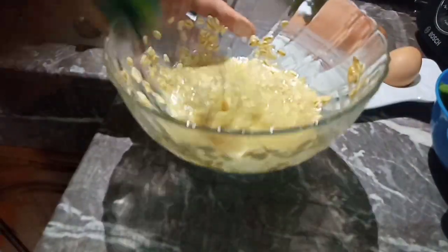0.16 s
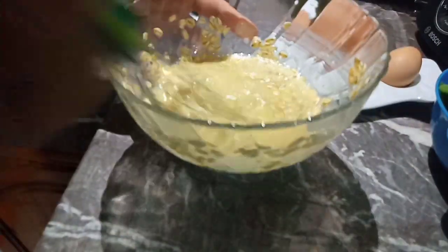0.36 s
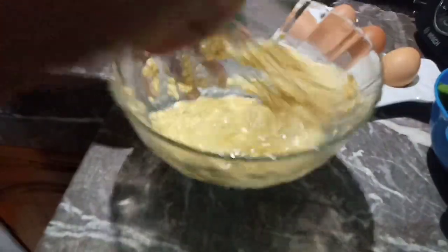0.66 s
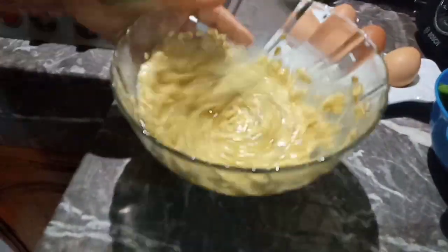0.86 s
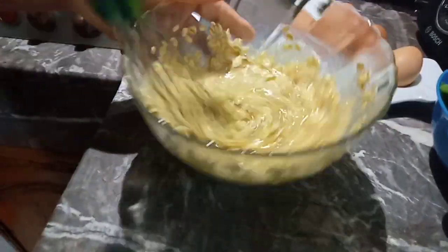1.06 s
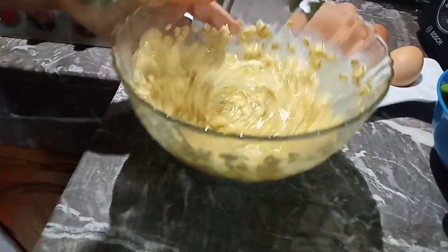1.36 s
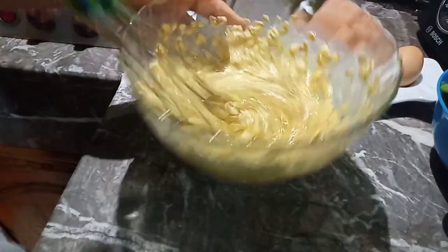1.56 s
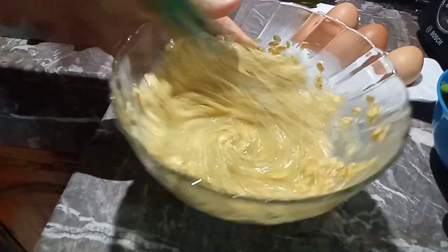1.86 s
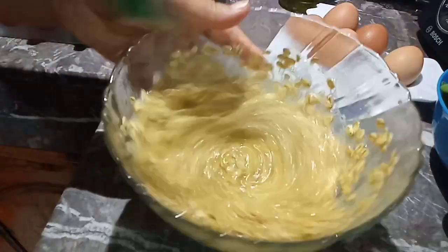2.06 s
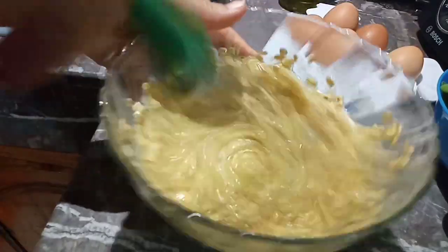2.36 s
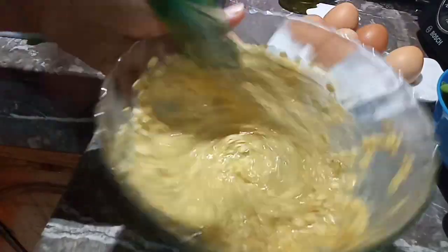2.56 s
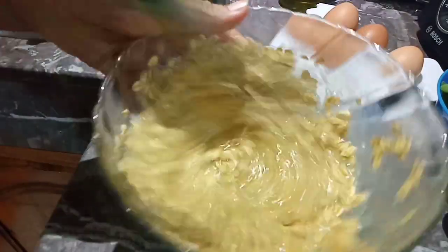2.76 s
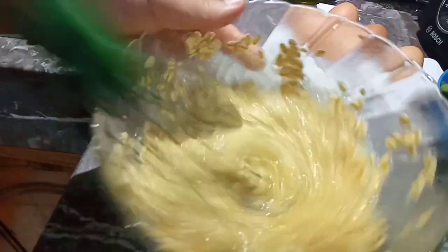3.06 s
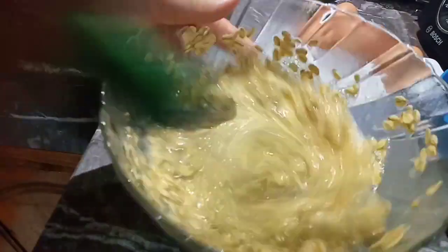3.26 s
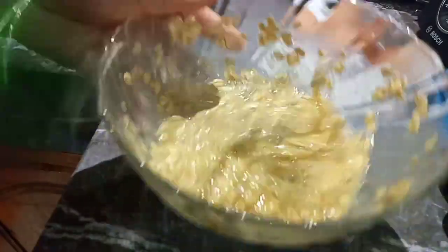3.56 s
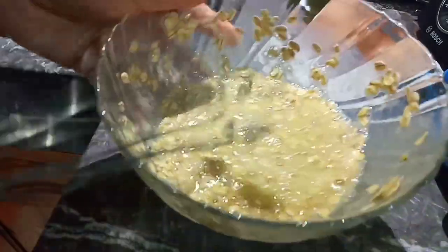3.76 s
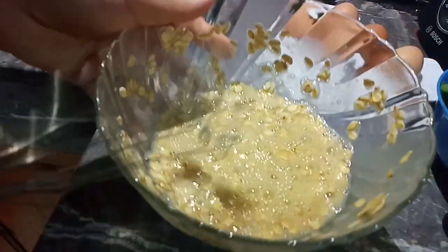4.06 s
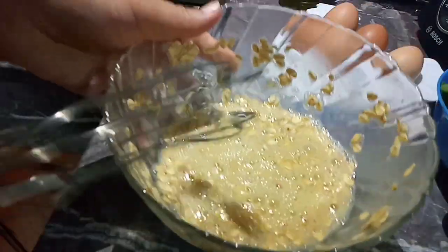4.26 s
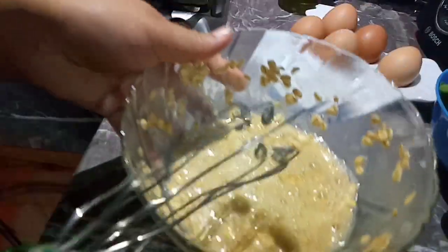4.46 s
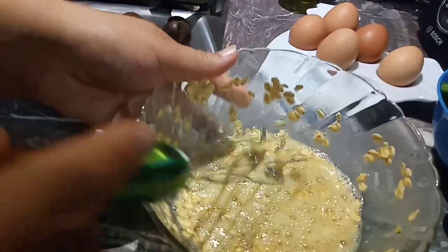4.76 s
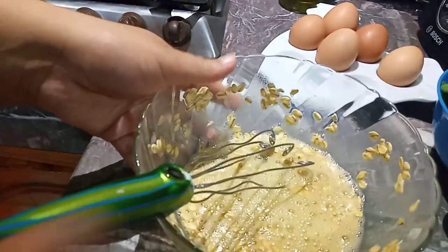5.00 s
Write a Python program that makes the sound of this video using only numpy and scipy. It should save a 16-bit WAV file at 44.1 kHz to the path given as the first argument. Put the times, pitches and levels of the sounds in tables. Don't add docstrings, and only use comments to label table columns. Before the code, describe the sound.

Close in a small hard-walled kitchen, a wire whisk taps a glass bowl's rim twice, then quickly beats wet oats and egg with dense clicks and gritty scraping. After about three seconds the stirring stops, light glassy taps follow, and the bowl lands on a stone counter with loud dull knocks. A steady fan and faint fridge hum lie beneath.

```python
import sys
import numpy as np
from scipy import signal
from scipy.fft import rfft, irfft, next_fast_len
from scipy.io import wavfile
from scipy.ndimage import uniform_filter1d, minimum_filter1d, map_coordinates

SR = 44100
rng = np.random.default_rng(int(sys.argv[2]) if len(sys.argv) > 2 else 0)


def magnitude_from_level(level_db):
    exponent = np.asarray(level_db, float) / 20
    return 10 ** exponent


def unload_wav(signal):
    wavfile.write(
        sys.argv[1],
        SR,
        np.round(np.clip(np.atleast_2d(signal).T, -1, 1) * 32767).astype(np.int16),
    )


N = 226277

# frequency in Hz, level in dB per Hz.
FAN_SPECTRUM = [(15, -63), (25, -25.5), (108, -3.5), (172, -13), (192, -6.5), (296, -9), (399, -18),
                (470, -18), (524, -11.5), (1220, -16), (2820, -11), (4020, -13), (5570, -32.5),
                (14000, -47), (16500, -55)]
# frequency in Hz, level in dB rms.
FRIDGE_HUM = [(120, -61), (182, -72), (240, -67.5)]
# frequency in Hz, t60 in seconds.
ROOM_T60 = [(200, 0.56), (2000, 0.42), (5000, 0.34), (15000, 0.24)]

# start in seconds, level in dB, frequency in Hz, t60 in seconds.
THUMPS = [
    (0.075, -34.5, 130, 0.028),
    (0.316, -27.5, 130, 0.014),
    (2.214, -35.5, 130, 0.033),
    (2.449, -10.5, 137, 0.007),
    (2.664, -23, 130, 0.012),
    (3.318, -40, 130, 0.037),
    (4.176, -25, 130, 0.017),
    (4.394, -37, 130, 0.03),
]
# start in seconds, level in dB,
# frequency in Hz, t60 in seconds.
RIM_HUMS = [(.0705, -14, 3700, .045), (.0705, -20, 2530, .04), (.0705, -24, 3100, .04),
            (.0705, -35, 6718, .07), (.075, -32, 2440, .25), (.3145, -22, 2369, .25),
            (.325, -26, 3600, .15), (.388, -25, 3650, .03), (.3145, -14, 3655, .06),
            (.3145, -20, 2560, .05), (.3145, -27, 3149, .06), (.384, -42, 581, .14),
            (.543, -42.5, 590, .16), (3.667, -32, 533, .2), (3.676, -29, 2246, .1), (3.687, -33, 2000, .03),
            (3.711, -33, 2400, .05), (3.839, -38, 1577, .1), (3.851, -32, 1346, .2),
            (3.851, -32, 2379, .22), (3.851, -30, 3779, .12), (3.92, -38, 5006, .14),
            (3.92, -33, 2420, .15), (3.92, -33, 1400, .06), (3.932, -30, 1346, .14),
            (3.932, -33, 3618, .18), (4.045, -26, 1550, .04), (4.046, -26, 3876, .065),
            (4.058, -29, 3790, .08), (4.058, -35, 4775, .04), (4.046, -31, 2500, .08),
            (4.058, -30, 2390, .16), (4.17, -21.5, 3900, .056), (4.172, -28, 5030, .04),
            (4.182, -21, 3960, .044), (4.183, -20, 2374, .12), (4.94, -21, 635, .2),
            (4.941, -19, 1389, .35), (4.942, -23, 2363, .3), (4.958, -22, 1389, .25),
            (4.957, -41, 3575, .5)]
# start in seconds, level in dB, frequency in Hz, t60 in seconds.
WET_PINGS = [(1.165, -26, 4200, .02), (1.2705, -25, 3590, .05), (1.485, -36, 8290, .03),
             (1.529, -39, 9350, .03), (1.765, -26, 915, .03), (1.99, -34, 8290, .04),
             (1.998, -32, 8290, .03), (2.041, -30, 4050, .02), (2.055, -32, 3750, .02),
             (2.141, -33, 786, .12), (2.199, -30, 816, .08), (2.215, -31, 8290, .04),
             (2.449, -30, 8290, .03), (2.666, -29, 8290, .04), (3.103, -25, 645, .08),
             (3.208, -28, 773, .05), (3.33, -26, 640, .06), (1.03, -30, 600, .08), (1.11, -37, 850, .1)]

# start in seconds, peak in dB, blow frequency in Hz,
# blow t60 in seconds, shudder in dB re the blow.
KNOCKS = [
    (4.7376, 0, 1620, .012, -14.5),
    (4.76, -16, 900, .008, -10),
    (4.78, -27, 237, .1, 4),
    (4.9445, -12, 800, .008, -14),
    (4.96, -12, 900, .008, -14),
    (5.005, -15, 1600, .02, -11),
    (5.011, -7, 2340, .014, -13),
    (5.016, -10, 1290, .09, -13),
    (5.022, -15, 960, .04, -12),
]
CUTLERY = [
    (4.74, -27, 4340, 0.045, -29),
]
# frequency in Hz, width in Hz, level in dB.
COUNTER_MODES = [(237, 30, 3), (641, 60, 0), (748, 50, -1), (931, 70, 1), (1290, 60, 0), (1534, 100, 1),
                 (2094, 80, 2), (2256, 80, 2), (2929, 120, -4), (3112, 70, 0), (4300, 140, 6)]
# frequency in Hz, level in dB per Hz.
KNOCK_SPECTRUM = [(59, -54), (100, -16), (236, -8), (407, -6), (647, 0), (866, -2.5), (1310, -4.5),
                  (3840, -17.5), (4330, -32), (6000, -79), (7800, -103), (13200, -120)]

# start in seconds, peak in dB, then levels in dB of the modes
# under 1.9 kHz, over 3 kHz, over 4.6 kHz.
RIM_TAPS = [(0.0695, -18, -14.5, 2, -9), (0.1294, -35, -1.5, 1.5, -5), (0.3135, -12, -15, 2, -10.5),
            (0.3831, -27, -6, 7, -5.5), (0.5424, -24.5, -22, 5.5, -1.5), (3.6656, -21, -10.5, -2, -6),
            (3.6754, -21.5, -14.5, -0.5, -11), (3.8378, -26.5, -3, 2.5, 0.5), (3.8504, -24.5, -6, 3, -2.5),
            (3.9189, -23.5, -3, -0.5, 0), (3.9309, -25, 0, 6.5, -1.5), (4.0441, -22.5, -2, 5.5, -2.5),
            (4.0574, -22, -11, 3, -7.5), (4.169, -17, -9.5, 3, -6.5), (4.1814, -15.5, -6, -6, -4.5),
            (4.4909, -38, -2.5, -21, -3), (4.5082, -40.5, 0, 6, -13), (4.939, -25, 11.5, -13, -33.5),
            (4.9564, -20, 7, -14, -37)]
# t60 under the wires in seconds, level of the tail after it in dB.
TAP_HOLDS = [(.03, -7), (.04, -5), (.045, -5), (.04, -5), (.04, -5), (.04, -5), (.04, -5), (.04, -3),
             (.05, -3), (.04, -3), (.05, -4), (.03, -4), (.04, -4), (.035, -5), (.05, -5), (.04, -5),
             (.04, -5), (.04, -3), (.04, -3)]
# frequency in Hz, level in dB, t60 in seconds.
RIM_MODES = [(538, 0.5, 0.16), (595, -10, .15), (648, 2.5, 0.1), (759, -5, 0.29), (1043, -11.5, 0.42),
             (1353, -2, 0.41), (1374, 3, 0.171), (1627, -2, 0.13), (2026, -41.5, 0.1), (2360, 0.5, 0.49),
             (2443, 5, 0.26), (2610, -3.5, 0.16), (2750, -32.5, 0.3), (3130, -8.5, 0.061),
             (3300, -0.5, 0.038), (3590, -5, 0.074), (3604, 7.5, 0.17), (3807, 7, 0.049), (5030, 1, 0.05),
             (6634, -2, 0.1), (7740, -13, 0.056), (8410, -1.5, 0.092), (9340, -10, 0.037),
             (11100, -15, 0.15), (11200, -24, 0.053), (12100, -20, 0.05), (13570, -28, .07),
             (15300, -6, 0.089)]

# frequency in Hz, width in Hz, level in dB.
WET_MODES = [(640, 50, -5), (790, 60, -4), (915, 50, -5), (1030, 50, -5), (1265, 50, -6), (1840, 150, -3),
             (2710, 150, -3), (3440, 330, 0), (6600, 150, -21), (8290, 180, -14), (9350, 170, -25),
             (10200, 80, -25), (11400, 200, -28), (13800, 300, -27), (15000, 600, -30)]
# start in seconds, peak in dB, loudest mode in Hz,
# brightness over 4.8 kHz in dB.
TIP_TICKS = [(.622, -30.5, 2430, -9), (.6739, -20, 1720, -16), (.726, -19, 3470, -13.5),
             (.7946, -23, 3400, -12), (.9044, -15, 2460, -15), (.9646, -35, 1760, -22),
             (.9831, -21, 1770, -24), (1.165, -16.5, 2700, -16.5), (1.4356, -25, 2480, -19),
             (1.4618, -22.5, 3130, -29), (1.8482, -28.5, 3490, -27), (1.8666, -19.5, 3500, -17.5),
             (1.905, -27, 1850, -17), (1.9384, -20, 2600, -25), (1.9884, -26, 3530, -6),
             (2.083, -32, 3600, -35), (2.2157, -13, 3420, -16), (2.3684, -26, 3640, -26),
             (2.3784, -27, 3150, -15), (2.4256, -21, 3120, -45), (2.5428, -23, 3370, -19),
             (2.5623, -23, 2750, -24), (2.5869, -16, 3450, -21), (2.611, -22, 2620, -16),
             (2.7322, -17.5, 2470, -17), (2.873, -16.5, 2710, -13.5), (2.969, -22.5, 2600, -17),
             (3.0099, -22.5, 1790, -16), (3.0861, -22, 2800, -21), (3.2487, -23, 3350, -32),
             (.6, -30, 2390, -12), (.705, -33, 3000, -6), (.959, -26, 2840, -18), (1.623, -24, 3220, -18),
             (1.657, -32, 2500, -10), (1.714, -25, 3110, -22), (1.801, -30, 2600, -10),
             (2.416, -25, 3150, -20), (2.678, -22, 3400, -12), (2.817, -30, 3000, -8),
             (3.026, -19, 2600, -20), (3.039, -20, 3400, -12), (3.115, -20, 3200, -14),
             (3.263, -23, 3300, -20), (3.33, -16, 3300, -20)]
LOOP_SLAPS = [(.6652, -23, 1700, -8), (.8447, -31, 1900, -32), (1.022, -18.5, 3540, -12),
              (1.0356, -19.5, 3430, -8.5), (1.0701, -23.5, 3350, -9.5), (1.1351, -33, 2560, -16),
              (1.2132, -27.5, 3590, -8), (1.4837, -16.5, 2750, -15), (1.5079, -24, 2340, -28),
              (1.68, -17.5, 3600, -14), (1.9744, -20.5, 1790, -31), (2.1408, -24, 3640, -9.5),
              (2.344, -28, 3580, -9), (2.449, -11, 3300, -12), (2.4965, -19.5, 1770, -22),
              (2.6655, -17, 3450, -2.5), (2.7982, -25, 1530, -19), (2.8984, -18, 3400, -12),
              (2.9358, -21.5, 1700, -20), (2.9948, -29, 1740, -20), (3.2038, -24, 3520, -24),
              (3.221, -19.5, 2880, -12.5), (3.2965, -21.5, 2420, -31), (3.3026, -19.5, 3220, -33),
              (3.3444, -21.5, 3470, -8), (3.382, -26.5, 1800, -24), (3.4386, -34, 1840, -19),
              (1.3325, -18, 3300, -16), (2.113, -27, 1680, -25), (.65, -30, 1600, -25),
              (3.31, -20, 3080, -20), (2.866, -24, 1600, -20)]
WIRE_DRAGS = [(1.177, -22, 1670, -32), (1.2704, -20, 3590, -14), (1.3242, -19, 3400, -13),
              (1.5281, -19.5, 3530, -11.5), (1.7634, -20.5, 3690, -13.5), (2.6514, -18, 3500, -23),
              (2.7993, -21, 3770, -21), (3.0311, -17.5, 3230, -16), (3.1024, -13, 3300, -11.5),
              (3.3214, -13.5, 3560, -13.5)]
WIRE_SNAPS = [
    (1.1777, -21, 1690, -27),
    (1.938, -12, 3180, -25),
    (2.4975, -19, 1860, -20),
    (3.25, -13, 3250, -25),
]

# time in seconds, effort in dB.
CHURN_EFFORT = [(0.5, -58), (0.58, -53), (0.8, -43.5), (1.1, -41), (1.6, -42.5), (2.1, -47), (2.5, -41),
                (2.95, -39.5), (3.28, -49), (3.48, -50.5), (3.64, -43), (3.68, -74)]
# peak time in seconds, scrape in dB, time to lose 10 dB in seconds,
# grit over 4.8 kHz in dB.
SWEEPS = [(0.157, -30, 0.035, -21), (0.345, -33, 0.03, -14.5), (0.41, -36, 0.01, -20),
          (0.674, -32.5, 0.07, -20), (0.912, -33.5, .05, -20.5), (1.032, -38, 0.19, -16),
          (1.172, -32, 0.06, -27), (1.278, -29, 0, -29), (1.336, -38.5, 0.26, -15),
          (1.52, -31.5, 0.04, -22), (1.759, -35, 0.28, -19.5), (1.988, -33.5, 0.11, -21),
          (2.222, -29, 0.1237, -22), (2.364, -35.5, 0.18, -22), (2.44, -27, 0.045, -12.5),
          (2.664, -26.5, 0.11, -18), (2.799, -32.5, 0.0572, -23), (2.884, -24.5, 0.05, -17.5),
          (3.034, -31, 0.09, -22), (3.106, -27.5, 0.0564, -22), (3.245, -35, 0.12, -33),
          (3.329, -27.5, 0.0761, -18), (3.705, -43, 0.06, -14), (3.87, -42, 0.07, -14),
          (3.945, -41, 0.06, -14), (4.065, -39.5, 0.06, -14), (4.2, -34.5, 0.05, -16.5)]
# frequency in Hz, level in dB per Hz.
SCRAPE_SPECTRUM = [(240, -41), (400, -21), (777, -7), (1380, -9.5), (1820, -3), (2300, -7), (3450, -1),
                   (5430, -20), (7630, -21.5), (8370, -20), (12100, -41.5), (13900, -33), (16000, -52)]


def unit(x):
    return x / np.sqrt(np.mean(x ** 2) + 1e-20)


def along(points, hz):
    f, v = np.transpose(points)
    return np.interp(np.log(hz + 1), np.log(f + 1), v)


def wobble(rate_hz, size=N):
    knots = rng.standard_normal(int(size * rate_hz / SR) + 4)
    return map_coordinates(knots, [np.arange(size) * rate_hz / SR])


def filtered(x, response):
    m = next_fast_len(len(x) + 4096)
    return irfft(rfft(x, m) * response(np.fft.rfftfreq(m, 1 / SR)), m)[:len(x)]


def resonances(modes, spread_db):
    gains = [magnitude_from_level(db + spread_db * rng.standard_normal()) for _, _, db in modes]
    return lambda f: sum(g * 1j * f * width / (hz * hz - f * f + 1j * f * width)
                         for g, (hz, width, _) in zip(gains, modes))


def balanced(x, edges_hz, levels_db):
    out = 0
    for low_hz, high_hz, db in zip(edges_hz, edges_hz[1:], levels_db):
        band = signal.sosfilt(signal.butter(3, (low_hz, high_hz), "band", fs=SR, output="sos"), x)
        out = out + magnitude_from_level(db) * band / np.abs(band).max()
    return out


def burst(contact_s, size):
    t = np.arange(size) / SR
    rattle = rng.standard_normal(size) * np.abs(rng.standard_normal(size))
    return magnitude_from_level(-20 * t / max(contact_s, 3e-4)) * (1 - np.exp(-t / 0.0005)) * rattle


def add(track, start_s, sound):
    part = track[round(start_s * SR):][:len(sound)]
    part += sound[:len(part)]


def floor():
    z = signal.stft(rng.standard_normal(N), nperseg=512)[2]
    patches = uniform_filter1d(rng.standard_normal(z.shape), size=6, axis=0)
    patches = uniform_filter1d(patches, size=12, axis=1)
    noise = signal.istft(z * magnitude_from_level(1.2 * unit(patches)), nperseg=512)[1][:N]
    fan = unit(filtered(noise, lambda f: magnitude_from_level(along(FAN_SPECTRUM, f))))
    out = magnitude_from_level(-47.5 + 0.64 * wobble(3.1)) * fan
    t = np.arange(N) / SR
    for hz, db in FRIDGE_HUM:
        level = np.sqrt(2) * magnitude_from_level(db + 2.9 * wobble(5.22))
        out += level * np.sin(2 * np.pi * hz * t + 0.38 * wobble(11))
    return out


def kitchen(x):
    out, step = np.zeros(N), SR // 5
    for start in range(-step, N, step):
        hz, t, z = signal.stft(rng.standard_normal(SR // 2), SR, nperseg=256)
        tail = signal.istft(z * magnitude_from_level(-60 * t / along(ROOM_T60, hz)[:, None]), SR, nperseg=256)[1]
        at = np.arange(max(start, 0), min(start + 2 * step, N))
        piece = x[at] * np.sin(np.pi * (at - start) / (2 * step))
        add(out, at[0] / SR + .004, signal.fftconvolve(piece, tail / np.linalg.norm(tail)))
    return out


def thumps():
    out, t = np.zeros(N), np.arange(SR // 4) / SR
    for s, db, hz, t60_s in THUMPS:
        add(out, s, -magnitude_from_level(db + 2.0 - 60 * t / t60_s) * np.sin(2 * np.pi * hz * t))
    waver_db, rise_s = 2.5, .0005
    for s, db, hz, t60_s in RIM_HUMS + WET_PINGS:
        swell, drift = wobble(70, size=len(t)), wobble(60, size=len(t))
        level = magnitude_from_level(db + waver_db * swell - 60 * t / t60_s) * (1 - np.exp(-t / rise_s))
        add(out, s, level * np.sin(2 * np.pi * hz * t + .9 * drift))
    return out


def knocks():
    out, t = np.zeros(N), np.arange(SR // 2) / SR
    shudder_t60_s = 0.21
    body = resonances(COUNTER_MODES, spread_db=0)
    for s, db, hz, t60_s, shudder_db in KNOCKS + CUTLERY:
        onset = 1 - np.exp(-(t / 0.00042) ** 2)
        blow = -magnitude_from_level(-60 * t / t60_s) * onset * np.sin(2 * np.pi * hz * t)
        noise = rng.standard_normal(len(t)) * magnitude_from_level(3 * wobble(150, size=len(t)))
        noise = unit(filtered(noise, lambda f: magnitude_from_level(along(KNOCK_SPECTRUM, f)) * (0.37 + body(f))))
        shudder = magnitude_from_level(shudder_db - 60 * t / shudder_t60_s) * noise * (1 - np.exp(-t / 0.0011))
        add(out, s, magnitude_from_level(db) * (blow / np.abs(blow).max() + shudder))
    return out


def taps():
    out, t = np.zeros(N), np.arange(SR // 5) / SR
    held_db = -10
    waver_db, tail_share = 4, .6
    hz, level_db, t60_s = np.transpose(RIM_MODES)[:, :, None]
    for (s, db, low_db, upper_db, top_db), (touch_t60_s, tail_db) in zip(RIM_TAPS, TAP_HOLDS):
        knots = np.repeat(rng.standard_normal((2, len(RIM_MODES), 20)), 600, axis=2)
        swell, drift = uniform_filter1d(knots, size=600, axis=2)[..., :len(t)]
        touch = magnitude_from_level(-60 * t / touch_t60_s)
        tail = magnitude_from_level(tail_db + waver_db * swell - 60 * t / (tail_share * t60_s))
        phase = 2 * np.pi * hz * t + 1.61 * (drift - .3 * drift[:, :1])
        ring = np.sum(magnitude_from_level(level_db) * (touch + tail) * np.sin(phase), axis=0)
        jangle = magnitude_from_level(8.5) * burst(0.0045, size=len(t)) + magnitude_from_level(6) * burst(.025, size=len(t))
        jangle = filtered(jangle, lambda f: magnitude_from_level(6) / (1 + 1j * f / 5000) / (1 + 1200 / (1j * f + 1)))
        levels_db = db + np.array([low_db + held_db, low_db, 0, upper_db, top_db])
        add(out, s, balanced(ring + jangle, [400, 900, 1900, 3000, 4600, 15500], levels_db))
    return out


def wall_contacts(contacts, low_db, contact_s):
    out = np.zeros(N)
    airy_db = -9
    for s, db, hz, high_db in contacts:
        modes = [(mode_hz, width + 120, 0) for mode_hz, width, _ in WET_MODES]
        spot = resonances(modes + [(hz, 200, 9)], spread_db=4)
        sound = filtered(burst(contact_s, size=3000), lambda f: (0.13 + spot(f)) / (1 + 1j * f / 7000))
        top_db = high_db + airy_db + 1.8 * rng.standard_normal()
        levels_db = db + np.array([low_db, 0, high_db, top_db])
        add(out, s - .001, balanced(sound, [500, 1500, 4800, 10500, 15500], levels_db))
    return out


def clicks():
    return (wall_contacts(TIP_TICKS, low_db=-24.5, contact_s=0.0061)
            + wall_contacts(LOOP_SLAPS, low_db=-7.5, contact_s=0.0061)
            + wall_contacts(WIRE_DRAGS, low_db=-8, contact_s=0.016)
            + wall_contacts(WIRE_SNAPS, low_db=-25, contact_s=0.0016))


def stirring():
    t = np.arange(N) / SR
    rise_over_fall, churn_grit_db = 0.79, -23.5
    churn = magnitude_from_level(np.interp(t, *np.transpose(CHURN_EFFORT), -99, -99))
    body, grit = churn, churn * magnitude_from_level(churn_grit_db)
    for s, db, fade_s, grit_db in SWEEPS:
        swell = magnitude_from_level(db - 10 * np.maximum((s - t) / rise_over_fall, t - s) / fade_s)
        body, grit = np.hypot(body, swell), np.hypot(grit, swell * magnitude_from_level(grit_db))
    return body, grit


def scrape():
    body, grit = stirring()
    slosh_db = -6
    hits = (rng.random(N) < 1200 / SR) * rng.standard_normal(N)
    grains = hits * magnitude_from_level(4.2 * np.minimum(rng.exponential(size=N), 3))
    rub = unit(grains) * 0.59 + rng.standard_normal(N) * magnitude_from_level(4.0 * wobble(60))
    rub = rub * magnitude_from_level(1.8 * wobble(28))
    glass = resonances([(hz, width, -4 * (hz > 4800)) for hz, width, _ in WET_MODES], spread_db=0)
    rub = filtered(rub, lambda f: magnitude_from_level(along(SCRAPE_SPECTRUM, f)) * (.8 + glass(f)))
    low = unit(filtered(rub, lambda f: f < 1500))
    mid = unit(filtered(rub, lambda f: (f >= 1500) & (f < 4800)))
    high = unit(filtered(rub, lambda f: f >= 4800))
    return magnitude_from_level(-3.5) * (body * (mid + magnitude_from_level(slosh_db) * low) + grit * high)


def scene():
    settles_s, muted_db = 5.008, -14
    free = magnitude_from_level(np.interp(np.arange(N) / SR, [settles_s, settles_s + .012], [0, muted_db]))
    bowl = scrape() + clicks() + free * taps() + knocks() + free * thumps()
    return (bowl + magnitude_from_level(-10.5) * kitchen(bowl) + floor())[None]


def low_pass(x):
    return signal.sosfilt(signal.butter(12, 16670, fs=SR, output="sos"), x)


def record(dry):
    x = signal.sosfilt(signal.butter(4, 50, "high", fs=SR, output="sos"), dry)
    x = signal.sosfilt(signal.butter(12, 15800, fs=SR, output="sos"), x)
    need = np.minimum(1, .9 / (np.abs(x) + 1e-9))
    ahead = np.roll(minimum_filter1d(need, size=1000, axis=1), -300, axis=1)
    gain = uniform_filter1d(ahead, size=160, axis=1)
    return low_pass(x * gain)


dry = scene()
out = record(dry)
unload_wav(out)
```